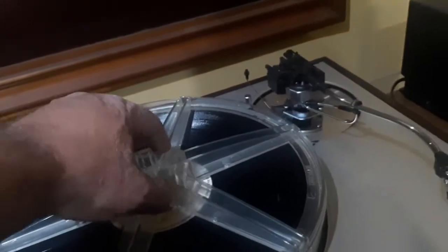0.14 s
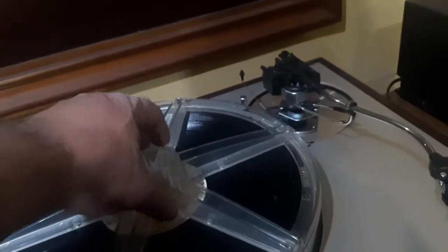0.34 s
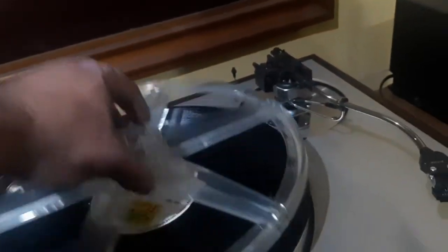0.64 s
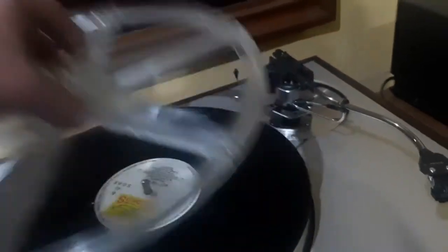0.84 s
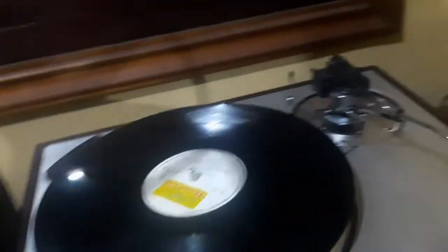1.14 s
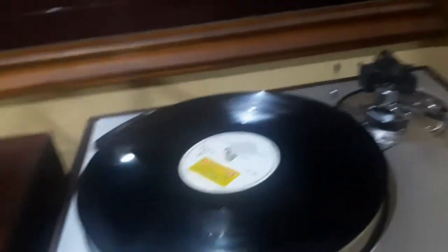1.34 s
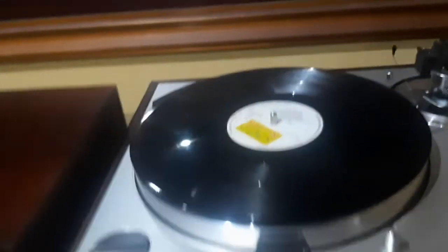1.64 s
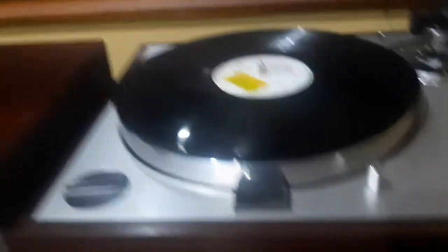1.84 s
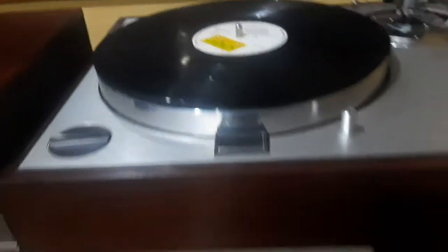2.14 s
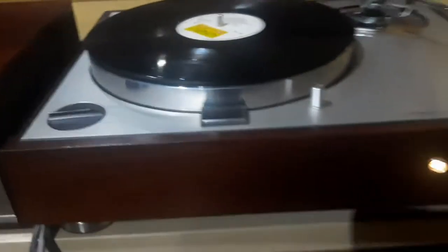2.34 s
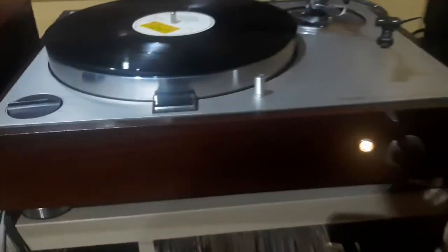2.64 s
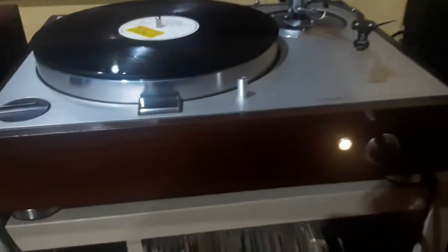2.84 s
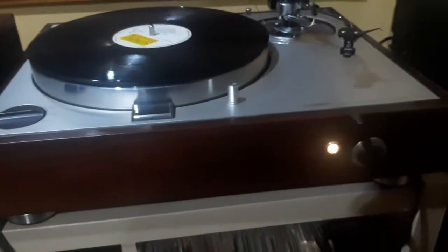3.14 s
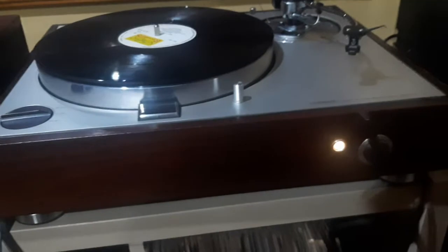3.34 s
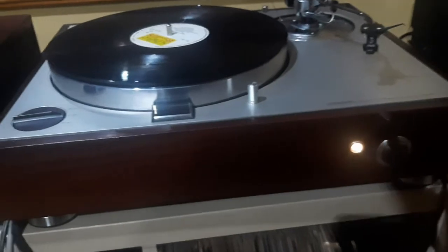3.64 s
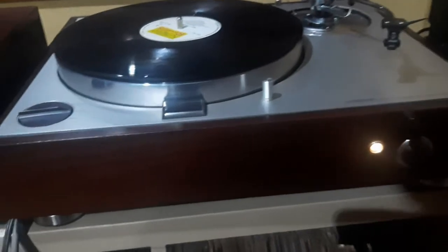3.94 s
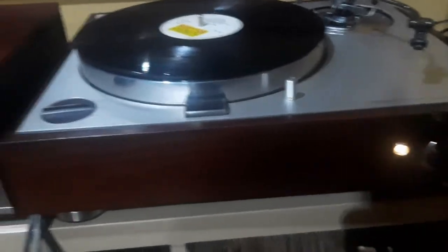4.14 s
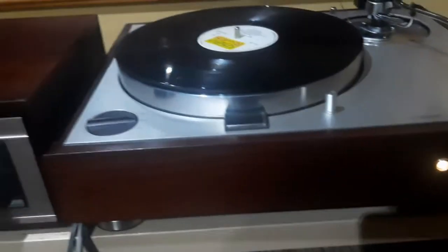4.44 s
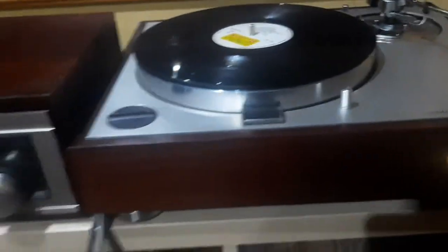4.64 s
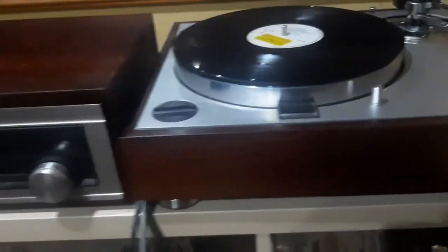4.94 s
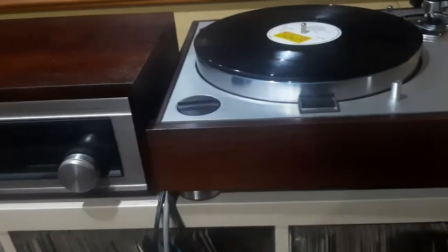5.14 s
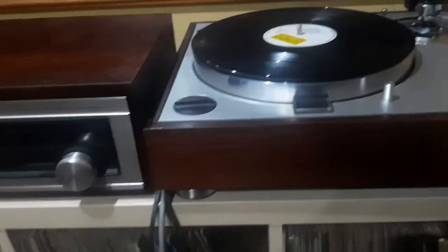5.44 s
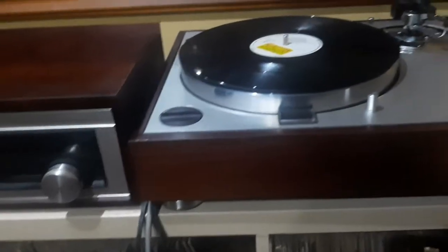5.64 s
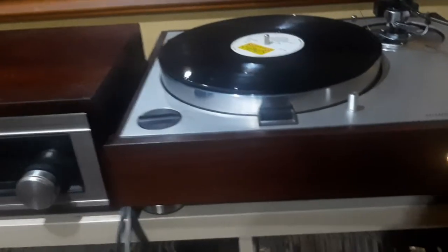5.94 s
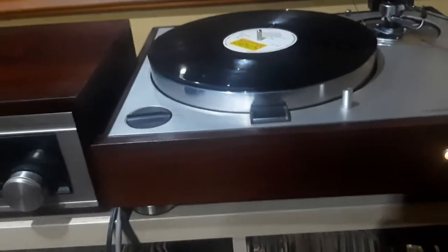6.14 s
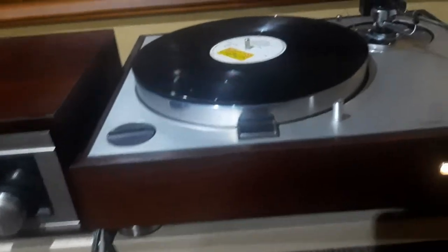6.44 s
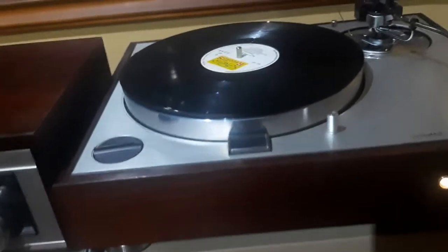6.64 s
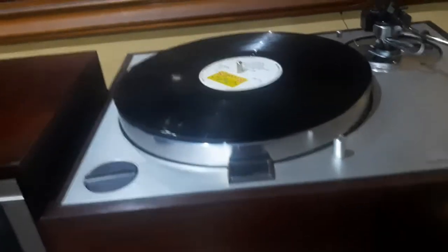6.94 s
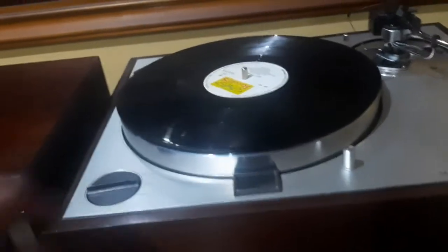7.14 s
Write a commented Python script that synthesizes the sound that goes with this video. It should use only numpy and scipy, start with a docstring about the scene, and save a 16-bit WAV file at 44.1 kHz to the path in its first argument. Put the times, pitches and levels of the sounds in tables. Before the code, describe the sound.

A small suction pump under a turntable runs with rapid paired knocks, each with a slight ring and a puff of air, slowing gradually. A catch clicks at the start. A plastic clamp is put down with a rattling clatter, and later hard objects clack sharply nearby. Faint cloth rustle and ticking come from the hand-held phone in a quiet furnished room.

```python
"""Suction pump under a turntable

A small pump knocks in pairs, out-stroke and return, slower as the vacuum builds: each stroke rings the
valve housing and cabinet and puffs air. A catch clicks, a plastic clamp is put down and hard things
clack nearby, ringing and rattling. Cloth rustles and the hand-held phone ticks and crackles.
The quiet furnished room is heard through two phone microphones of different colour."""
import sys
import numpy as np
from scipy import signal
from scipy.fft import rfft, irfft, next_fast_len
from scipy.io import wavfile

SR = 44100
rng = np.random.default_rng(int(sys.argv[2]) if len(sys.argv) > 2 else 0)


def store_wav(level_fs):
    """Save 16-bit WAV to argv[1]."""
    pcm = np.round(np.clip(np.atleast_2d(level_fs), -1, 1) * 32767)
    wavfile.write(sys.argv[1], SR, pcm.T.astype(np.int16))


N = 321481

# Noise spectra of the background, handling, rattles and valve air: frequency_hz, density_db
FLOOR_SPECTRUM = [(15, -32), (25, -11), (92, 1), (384, -6), (624, -10), (1040, -16), (1290, -21),
                  (2220, -18), (2840, -22), (5140, -23), (7310, -26), (12500, -23), (16000, -21.5)]
CRACKLE_SPECTRUM = [(3500, -17), (4900, -9.5), (5250, 1), (5600, -15), (9000, -21.5), (10800, -2),
                    (13000, -4), (15500, -10.5)]
RUB_SPECTRUM = [(60, -37), (110, -5), (200, 3), (540, 0.5), (640, -6.5), (1000, -6.5), (1250, -17.5),
                (2000, -19.5), (3000, -46)]
RUSTLE_SPECTRUM = [(590, -53.5), (1000, 1.5), (1120, -2.5), (1670, -10), (1790, -6), (3460, -13),
                   (4170, -16.5), (5300, -25), (6200, -31), (7700, -42.5), (12300, -26), (16000, -22)]
CATCH_RATTLE = [(470, -58), (800, -29), (1060, -6), (1740, -23), (1950, -1), (2390, -9), (3730, -16),
                (9000, -48), (11700, -71), (19800, -120)]
CLAMP_RATTLE = [(100, -50), (165, -32), (215, -1.5), (365, 1), (645, 3.5), (800, -5), (1100, 2.5),
                (1500, -4.5), (2000, -5), (3000, -13.5), (4200, -18), (5400, -23.5), (6500, -37),
                (9000, -54), (12000, -77)]
CLACK_RATTLE = [(59, -48), (100, -6), (266, 3.5), (451, -6), (1370, 6.5), (1560, -1), (2750, -2.5),
                (5410, -15), (5950, -29.5), (9000, -42), (11700, -65.5), (19800, -120)]
PUFF_SPECTRUM = [(100, -52), (300, 13.5), (700, 4.5), (1300, 8), (1700, -4.5), (2400, -11.5), (3200, -23),
                 (6000, -38)]
# Reverberation time of the room: frequency_hz, t60_s
ROOM_DECAY = [(100, 0.4), (1000, 0.2), (4000, 0.39), (12000, 0.23)]
# Response of the left microphone over the right: frequency_hz, gain_db
LEFT_OVER_RIGHT = [(200, 1), (600, -1), (1200, -1.5), (1800, -15), (2500, -14.5), (3500, -8.5), (5000, 2),
                   (8000, 10), (15000, 10.5)]
# Faint lingering tones: start_s, end_s, pitch_hz, width_hz, level_db
FAINT_TONES = [(5.54, 5.62, 228, 25, -56), (5.63, 5.71, 228, 40, -57), (5.54, 5.63, 2040, 40, -62),
               (5.64, 5.7, 2040, 60, -72), (6.28, 6.44, 1290, 60, -75), (6.92, 7.16, 395, 35, -70),
               (6.95, 7.29, 2390, 200, -82), (.9, 1.35, 2400, 350, -78), (1.25, 2.2, 2450, 400, -78),
               (2.875, 2.98, 208, 30, -52), (2.88, 2.98, 1060, 70, -54), (2.875, 2.94, 1980, 80, -59)]
# Spells of ticking and crackle in the phone: start_s, end_s, crackle_db
TICK_SPELLS = [(0, 0.214, -78), (0.64, 1.25, -82.5), (1.775, 2.62, -85.5), (2.747, 3.944, -86.5),
               (4.3, 6.298, -92), (6.72, 7.277, -87)]
# Quick runs of four ticks: start_s, level_db
TICK_RUNS = [(0.661, -60), (.7198, -62.5), (3.695, -65), (3.741, -58.5), (4.7425, -61), (6.73, -63)]
# Envelope of the low rubbing: time_s, level_db
RUB_LEVELS = [(0, -64.5), (1.5, -70.5), (1.95, -72.5), (2.25, -56), (2.6, -57.5), (2.9, -68.5),
              (3.2, -52.5), (3.4, -77.5), (5.5, -81), (5.62, -65), (5.72, -69), (5.85, -65), (6.2, -65),
              (6.35, -88), (7.29, -78)]
# Swishes of cloth and hand: peak_s, rise_s, fall_s, level_db, treble_gain_db, top_octave_db
SWISHES = [(.85, 0.18, .4, -89, 3, -110), (1.6, .1, 0.079, -69.5, 1.5, -86),
           (1.965, 0.048, 0.066, -69, 6.5, -85), (2.45, 0.85, .7, -67, -11.5, -99),
           (3.0, 0.19, 0.33, -64.5, -8, -83), (4.1, 0.29, .25, -71.5, -10.5, -95),
           (4.6, 0.11, 0.22, -71.5, 1, -86), (4.88, 0.16, 0.19, -67, -3.5, -82),
           (5.2, 0.2, 0.23, -70.5, -7, -79.5), (5.62, 0.16, .12, -66, -11, -100),
           (5.85, 0.095, 0.51, -59, 4, -88), (6.169, .17, 0.13, -61, 8.5, -70),
           (6.55, 0.26, 0.13, -73, -8, -109), (7.29, 0.76, 0.089, -80, 5.5, -106)]
# Impacts: start_s, level_db, bass_gain_db, treble_gain_db, top_gain_db, rattle_t60_s, left_lag_samples
CATCH_BLOWS = [(.078, -51.5, 8.5, -11.5, -40, 0.29, 8.5), (.125, -47, 5.5, 4.5, 7, 0.24, 11)]
CLAMP_BLOWS = [(2.642, -38.5, -26, 6.5, -20, 0.25, -13.5), (2.870, -36, -8, 9, -14, 0.42, -10),
               (2.895, -35, -21, 7, -13, 0.13, -17), (2.93, -54, -7, 2, -42, 0.14, -9),
               (3.057, -27.5, 8.5, 4.5, -19.5, 0.14, 5), (3.067, -32, 11, -16, -19, 0.19, -14),
               (3.094, -37, 7, 2, -19, 0.26, -3), (3.127, -46, 4, -16, -36, 0.52, -14)]
CLACK_BLOWS = [(5.541, -47, 14.5, -21, -40, 0.28, -12.5), (5.738, -30.5, 0.5, 4.5, -14.5, 0.16, -13.5),
               (5.762, -39, 5, -13, -37, 0.19, -7), (5.777, -48.5, 12.5, -13, -30, 0.53, -18),
               (5.847, -27.5, -4, 12.5, -9.5, 0.067, -15), (5.862, -33.5, 6.5, 8, -12, 0.17, -7),
               (5.932, -19, -2, 4.5, -16, 0.1, -13), (5.944, -30.5, -10, -1, -18, 0.4, -6.5),
               (6.028, -36.5, -27, 12, -44, 0.026, -13)]
# Modes of the struck objects, and of valve housing and cabinet on each stroke: pitch_hz, gain_db, t60_s
CATCH_MODES = [(1030, -14, .1), (1965, 4, 0.12), (2090, -18, .07), (3030, -8.5, 0.14), (3740, -17, 0.087)]
CLAMP_MODES = [(217.7, -10, 0.28), (296, -24, 0.099), (443, -15, 0.14), (515, -12.5, 0.21),
               (550, -10, 0.28), (669, -5, 0.21), (724, -21, 0.13), (1080, -18, 0.19)]
CLACK_MODES = [(134.5, -9.5, 0.17), (215, -13, 0.32), (810, -25, 0.37), (1066, -7.5, 0.49),
               (1440, -20, 0.085), (1470, -22, .12), (1670, -12, 0.14), (2310, -8, 0.05),
               (2370, -35, 0.061), (2630, -12.5, 0.087), (3480, -20, 0.17)]
OUT_VALVE_MODES = [(890.5, 2, 0.11), (1020, 1.5, 0.058), (1128, -5, 0.076), (712, -14, 0.062),
                   (1670, -24, 0.027), (2260, -9.5, 0.022)]
RETURN_VALVE_MODES = [(980, 10.5, 0.06), (892, -2, 0.025), (1062.7, 6, 0.064), (1158, 0.5, 0.073),
                      (710, -2.5, 0.084), (1522, 5, 0.033), (2447, -11.5, 0.035)]
OUT_CABINET_MODES = [(205.8, 1.5, 0.028), (181, -32.5, 0.011), (320, -8, 0.07), (374.7, -13, 0.1),
                     (506, -23, 0.049)]
RETURN_CABINET_MODES = [(207.7, 3, 0.024), (154.3, -12, 0.11), (306, 3, 0.039), (386, -3.5, 0.046),
                        (487, -20, 0.085)]
# Pump cycles, ever further apart: start_s, out_thump_db
PUMP_CYCLES = [(.028, -33), (0.154, -33.5), (.288, -32.5), (.425, -32), (0.564, -32), (0.703, -33.5),
               (.85, -32.5), (.996, -32), (1.147, -33), (1.298, -35.5), (1.458, -35), (1.621, -37),
               (1.787, -39), (1.956, -39.5), (2.13, -38.5), (2.308, -40.5), (2.493, -38.5), (2.682, -37),
               (2.878, -33), (3.084, -31), (3.297, -37.5), (3.516, -43), (3.745, -42), (3.993, -39.5),
               (4.249, -41), (4.521, -42), (4.809, -41), (5.11, -40.5), (5.429, -44), (5.761, -43.5),
               (6.093, -40.5), (6.443, -39), (6.805, -38), (7.209, -37)]
# Strokes as the vacuum builds: time_s, return_wait_ms, out_tick_db, return_tick_db, return_thump_db
VACUUM_BUILD = [(0, 56, -53, -60, -38), (.75, 63.5, -61, -56, -42.5), (1.15, 66.2, -53, -55, -39),
                (1.45, 68, -51.5, -55.5, -39.5), (2.3, 68.4, -44, -49, -49), (2.9, 71, -43.5, -49.5, -44.5),
                (3.399, 76.5, -47.5, -52.5, -45), (4.3, 75, -48, -51, -44.5),
                (5.098, 76.4, -47.5, -54, -43.5), (7.29, 84.5, -45.5, -51, -45)]


def amp(db):
    """Amplitude ratio of a level in decibels."""
    return 10 ** (np.asarray(db) / 20)


def unit_rms(x):
    """Normalisation to unit mean power."""
    return x / np.sqrt(np.mean(x ** 2) + 1e-20)


def at_hz(points, hz):
    """Interpolation on a logarithmic frequency axis."""
    knots_hz, values = np.transpose(points)
    return np.interp(np.log(hz + 1), np.log(knots_hz), values)


def filtered(x, kind, hz, order=2):
    """A maximally flat low-, high- or band-pass filter."""
    return signal.sosfilt(signal.butter(order, hz, kind, fs=SR, output="sos"), x)


def colour(x, curve, power=1):
    """Zero-phase spectral weighting by a gain curve raised to a power."""
    size = next_fast_len(N)
    hz = np.arange(size // 2 + 1) * SR / size
    return irfft(rfft(x, size) * amp(power * at_hz(curve, hz)), size)[..., :N]


def noise(spectrum, shape=N):
    """Spectrally shaped noise of unit power."""
    return unit_rms(colour(rng.standard_normal(shape), spectrum))


def drift(hz):
    """Random fluctuation: low-passed noise of unit power."""
    pole = np.exp(-2 * np.pi * hz / SR)
    return unit_rms(signal.lfilter([1], [1, -2 * pole, pole * pole], rng.standard_normal(N + SR))[SR:])


def ring(x, hz, t60):
    """A damped resonator: its impulse response is a decaying sine."""
    r, w = amp(-60 / (max(t60, .003) * SR)), 2 * np.pi * hz / SR
    return signal.lfilter([0, np.sin(w)], [1, -2 * r * np.cos(w), r * r], x)


def strike(times, levels_db, modes, soft_s=0.012, spread_db=2.3):
    """Modal superposition: contacts drive each mode unevenly, and a soft contact makes the ring swell."""
    at = np.minimum(np.round(np.asarray(times) * SR).astype(int), N - 1)
    scatter_db = spread_db * rng.standard_normal((len(at), len(modes)))
    out = 0
    for k, (hz, gain_db, t60) in enumerate(modes):
        impulses = np.full(N, 1e-18)
        np.add.at(impulses, at, amp(levels_db + gain_db + scatter_db[:, k]))
        swell_s = max(soft_s, 3 / hz)
        force = ring(impulses, hz, swell_s) * 2 * np.log(1000) / (swell_s * SR)
        out = out + ring(force, hz, t60)
    return out


def lagged(x, samples):
    """Path difference: a source reaches the left microphone some samples after the right."""
    at = np.arange(N)
    return np.array([np.interp(at - samples / 2, at, x), np.interp(at + samples / 2, at, x)])


def noise_floor():
    """Coherence: low room hum is common to both sides, microphone hiss is independent."""
    sources = noise(FLOOR_SPECTRUM, (3, N))
    hum, hiss = filtered(sources[0], "low", 700), sources[1:]
    return amp(-68.5) * unit_rms(hum + hiss - 0.55 * filtered(hiss, "low", 700))


def room(x):
    """Reverberation: ten feedback delays a side, their loss set by the reverberation time."""
    size = next_fast_len(N + SR // 2)
    hz = np.arange(size // 2 + 1) * SR / size
    t60, spectrum, out = at_hz(ROOM_DECAY, hz), rfft(x, size), []
    for delays_s in rng.uniform(.008, 0.046, (2, 10)):
        loops = [amp(-60 * d / t60) * np.exp(-2j * np.pi * hz * d) for d in delays_s]
        response = sum((-1) ** k * loop / (1 - loop) for k, loop in enumerate(loops))
        out.append(irfft(spectrum * response, size)[:N])
    return np.array(out)


def faint_tones():
    """Narrow resonances give noise a pitch; each tone swells and fades."""
    out, t = 0, np.arange(N) / SR
    for start, end, hz, width, level_db in FAINT_TONES:
        band = filtered(rng.standard_normal(N), "band", [hz - width / 2, hz + width / 2])
        progress = np.clip((t - start) / (end - start), 0, 1)
        swell = np.sqrt(np.sin(np.pi * np.sqrt(progress)) + 1e-12)
        out = out + amp(level_db) * swell * unit_rms(band)
    return out


def phone_crackle(swish_top):
    """Amplitude modulation: the phone's ticks and crackle and the swishes' top octave shape one hiss."""
    t, crackle_level = np.arange(N) / SR, amp(-82.5)
    period_s, pair_gap_s, run_step_s = .102406, .016, .006
    clock = np.arange(.0214, N / SR - .05, period_s)
    awake, ticks = np.zeros(len(clock)), np.zeros(N)
    for start, end, level_db in TICK_SPELLS:
        crackle_level += amp(level_db) * np.clip(np.minimum(t - start, end - t) / 0.023, 0, 1)
        awake += (clock > start) & (clock < end)
    scatter = rng.standard_normal((len(clock), 2))
    ticks[(clock * SR).astype(int)] = awake * amp(-66 + 1.5 * scatter[:, 0])
    ticks[((clock + pair_gap_s) * SR).astype(int)] = awake * amp(-66.5 + 4 * scatter[:, 1])
    for start, level_db in TICK_RUNS:
        ticks[((start + run_step_s * np.arange(4)) * SR).astype(int)] = amp(level_db)
    specks = rng.random(N) < 120 * amp(5 * drift(20)) / SR   # a wandering rate makes clumps
    sizes = amp(3.2 * np.minimum(rng.exponential(1, N), 4))
    crackle = crackle_level * unit_rms(signal.lfilter([1], [1, -.98], specks * sizes) + 1.06)
    envelope = crackle + signal.lfilter([1], [1, -.985], ticks) + swish_top
    return envelope * noise(CRACKLE_SPECTRUM, (2, N))


def rubbing(returns):
    """Friction noise, low and patchy; a wash of the same noise follows each return of the pump."""
    t = np.arange(N) / SR
    level = amp(np.interp(t, *np.transpose(RUB_LEVELS)))
    wash_db, rise_s, t60 = -14.5, 0.043, 0.25
    for start, _, _, thump_db in returns:
        age = np.maximum(t - start, 0)
        level += amp(thump_db + wash_db - 60 * age / t60) * np.minimum(age / rise_s, 1)
    return level * amp(2 * drift(3.2)) * noise(RUB_SPECTRUM)


def cloth_swishes():
    """Sliding friction of cloth and hand: bell-shaped swells of noise, and their top-octave envelope."""
    t, dull, bright, top = np.arange(N) / SR, 0, 0, 0
    for peak_s, rise, fall, level_db, treble_db, top_db in SWISHES:
        swell = amp(-19.5 * ((t - peak_s) / np.where(t < peak_s, rise, fall)) ** 2)
        dull += amp(level_db) * swell
        bright += amp(level_db + treble_db) * swell
        top += amp(top_db) * swell
    friction = amp(2.05 * drift(35)) * noise(RUSTLE_SPECTRUM)
    return dull * filtered(friction, "low", 2800) - bright * filtered(friction, "high", 2800), top


def impacts(blows, modes, rattle_spectrum, ring_db):
    """Free vibration after impact: modes ring over a decaying rattle whose colour varies by blow."""
    sources = noise(rattle_spectrum, (3, N))
    direct = sources[0]
    scattered = filtered(sources[1:], "high", 500, order=1)   # differs at each microphone
    top = noise(CRACKLE_SPECTRUM, (2, N))
    out = np.zeros((2, N))
    for start, level_db, bass_db, treble_db, top_db, t60, lag in blows:
        rattle = lagged(direct, lag) + 0.92 * scattered
        bass_shelf = (amp(bass_db) - 1) * filtered(rattle, "low", 800)
        treble_shelf = (amp(treble_db) - 1) * filtered(rattle, "high", 2500)
        age = np.maximum(np.arange(N) / SR - start, 0)
        envelope = amp(level_db - 10 - 60 * age / t60) * np.minimum(age * 2000, 1)
        out += envelope * (rattle + bass_shelf + treble_shelf + amp(top_db - 60 * age / 0.15) * top)
    starts, levels_db, bass_db, *_, lags = np.transpose(blows)
    rings = strike(starts, levels_db + bass_db + ring_db, modes, soft_s=.004, spread_db=2.5)
    return filtered(out + lagged(rings, lags[0]), "high", 110)   # light things give no deep bass


def stroke_schedule():
    """Growing load slows the piston. Out-strokes and returns: start_s, tick_db, travel_ms, thump_db."""
    starts, thump_db = np.transpose(PUMP_CYCLES)
    times, *columns = np.transpose(VACUUM_BUILD)
    wait_ms, tick_db, back_tick_db, back_thump_db = [np.interp(starts, times, c) for c in columns]
    slowing_ms = 1.7 * starts
    outs = np.transpose([starts, tick_db, 10.59 + slowing_ms, thump_db])
    returns = np.transpose([starts + wait_ms / 1000, back_tick_db, 7.5 + slowing_ms, back_thump_db])
    return outs, returns[returns[:, 0] < N / SR]


def pump(strokes, valve, cabinet, judder_db, rebound_db, second_ring_db, puff_db):
    """Stick-slip and impact: the valve opens, the piston judders to its stop and pushes out air."""
    starts, tick_db, travel_ms, thump_db = np.transpose(strokes)
    ends = starts + travel_ms / 1000
    contact = ends - .005
    slip_s = 0.003996 * rng.uniform(.6, 1.4, (len(starts), 3))
    out = np.zeros(N)
    for k, gain_db in enumerate([-10, -7.5, -5]):   # the valve opens in three uneven slips
        slip = np.maximum(starts + (k - 1) * slip_s[:, k], 0)
        out += strike(slip, tick_db + gain_db, valve, soft_s=0.015)
    out += strike(contact + 0.00309, tick_db + rebound_db, valve[1:])
    # The valve's ring swells once more about 33 ms later.
    out += strike(starts + 0.033, tick_db + second_ring_db, valve[:2])
    out += strike(contact, thump_db - 1.5, cabinet, soft_s=0.027)   # the end stop
    # The piston slips once per swing of the main cabinet mode, which builds up towards the stop.
    main_hz = cabinet[0][0]
    for k in range(1, 5):
        slip = contact - k / main_hz * (1 + 0.1 * rng.standard_normal(len(starts)))
        before_stroke = slip < starts - .002
        slip_db = thump_db + judder_db - 0.37 * k - 60 * before_stroke
        out += strike(np.maximum(slip, 0), slip_db, cabinet[:1])
    t, flow = np.arange(N) / SR, np.zeros(N)
    for start, end, level_db in zip(starts, ends, thump_db + puff_db):
        swell = np.clip((t - start) / (end - start), 0, 1)
        flow += swell * amp(level_db - 60 * np.maximum(t - end, 0) / 0.066)
    puff = flow * amp(0.68 * drift(132)) * noise(PUFF_SPECTRUM)
    return filtered(out + puff, "high", 110, order=4)   # a small cabinet radiates no deep bass


def scene():
    """Superposition of direct sound and reverberation at two unlike microphones, over the noise floor."""
    outs, returns = stroke_schedule()
    knocks = pump(outs, OUT_VALVE_MODES, OUT_CABINET_MODES,
                  judder_db=-6.5, rebound_db=-22, second_ring_db=-8, puff_db=-15.5)
    knocks += pump(returns, RETURN_VALVE_MODES, RETURN_CABINET_MODES,
                   judder_db=-4, rebound_db=-17, second_ring_db=-37, puff_db=-12.5)
    hits = impacts(CATCH_BLOWS, CATCH_MODES, CATCH_RATTLE, ring_db=-8)
    hits += impacts(CLAMP_BLOWS, CLAMP_MODES, CLAMP_RATTLE, ring_db=-10.5)
    hits += impacts(CLACK_BLOWS, CLACK_MODES, CLACK_RATTLE, ring_db=-14)
    rub = rubbing(returns)
    cloth, swish_top = cloth_swishes()
    rustle = lagged(rub + cloth, 8.5)
    crackle = phone_crackle(swish_top)
    direct = lagged(knocks, 11.03) + lagged(faint_tones(), 1.7) + hits + rustle
    reverb = room(amp(-15.5) * knocks + amp(-19.5) * hits.mean(axis=0) + amp(-25) * rustle.mean(axis=0))
    left, right = direct + reverb + crackle
    microphones = np.array([colour(left, LEFT_OVER_RIGHT, .5), colour(right, LEFT_OVER_RIGHT, -.5)])
    return microphones + noise_floor()


def record(dry):
    """Band limiting: the microphones lose the deep bass, and the top is cut steeply."""
    top_cut = signal.cheby2(14, 60, 16150, fs=SR, output="sos")
    return signal.sosfilt(top_cut, filtered(dry, "high", 45))


dry = scene()
out = record(dry)
store_wav(out)
```